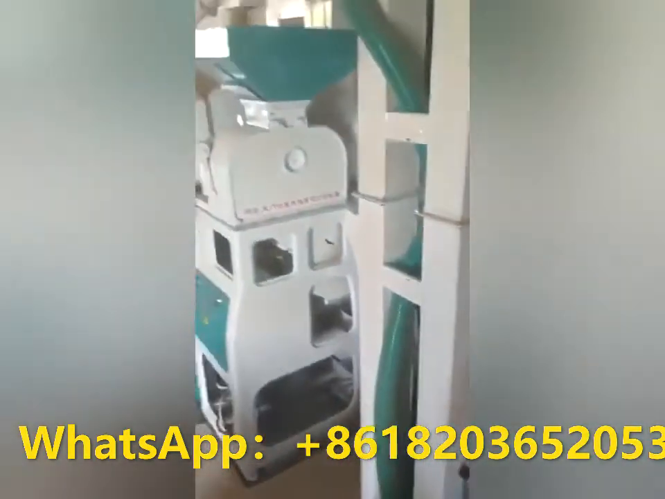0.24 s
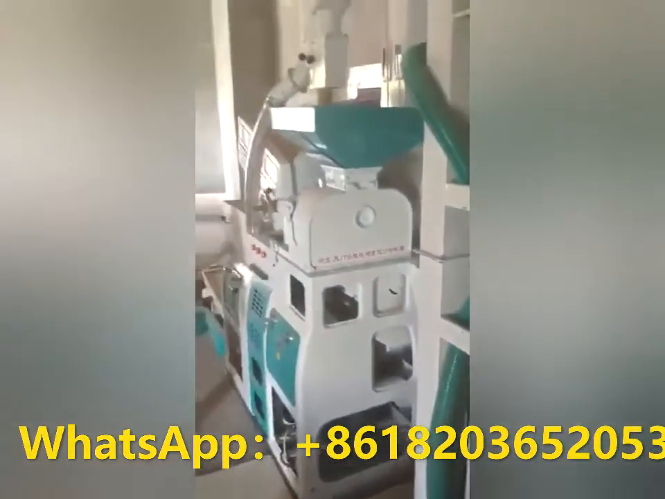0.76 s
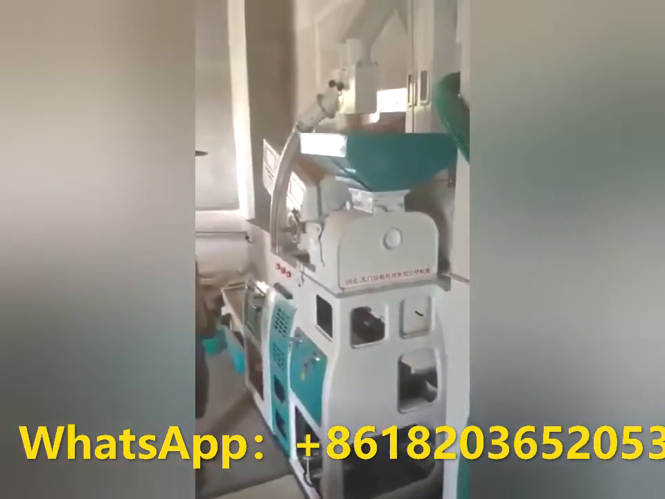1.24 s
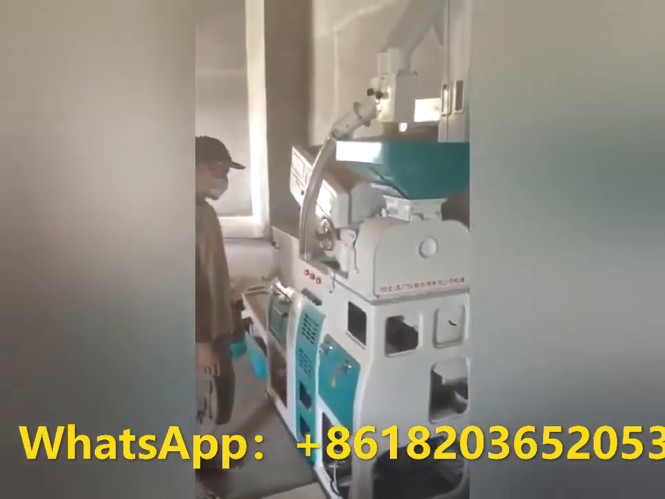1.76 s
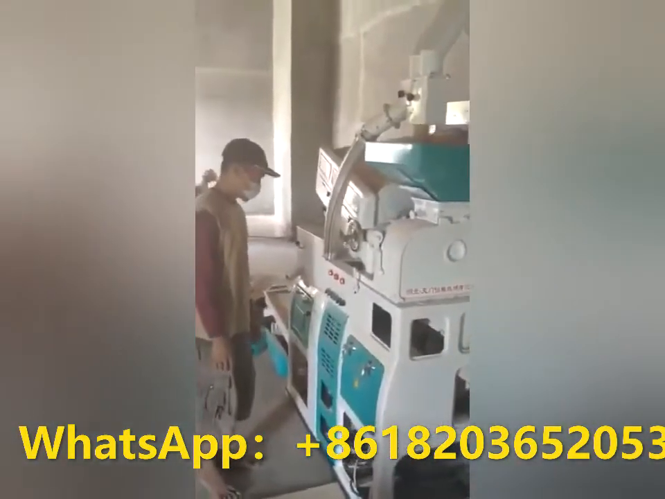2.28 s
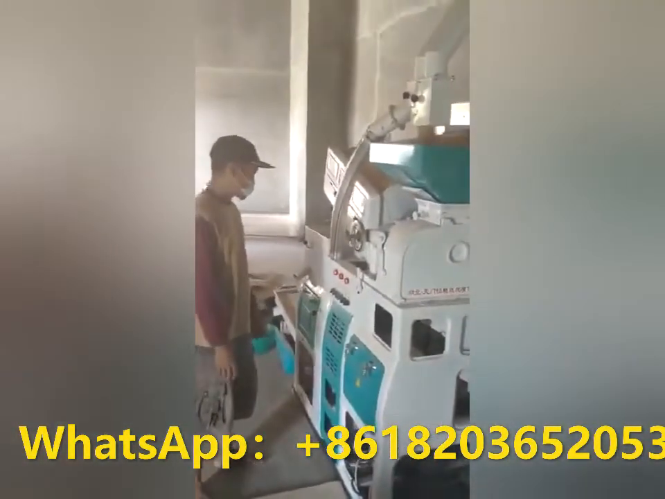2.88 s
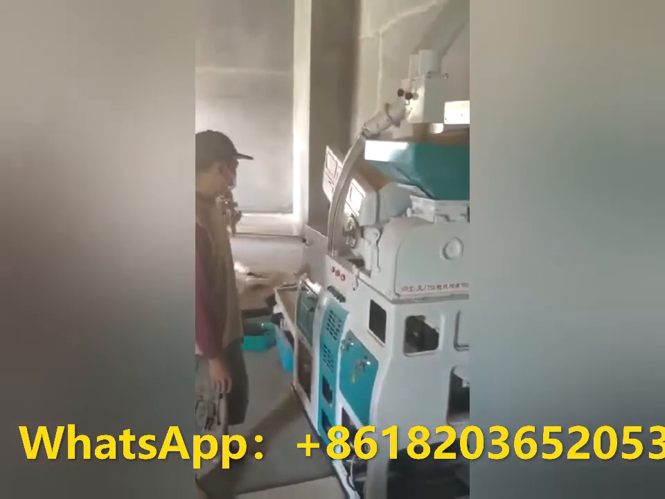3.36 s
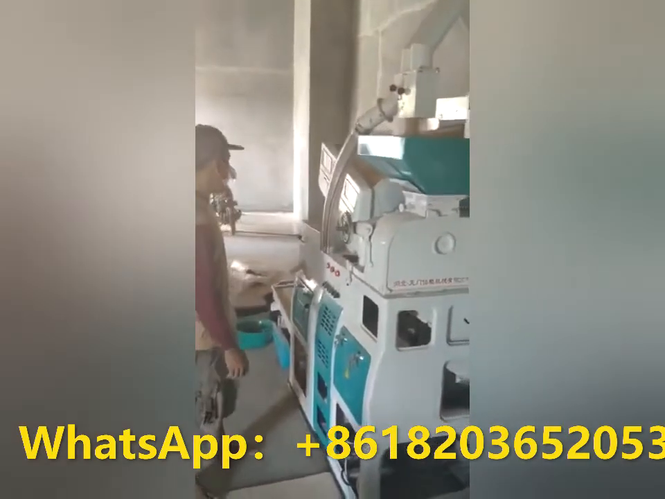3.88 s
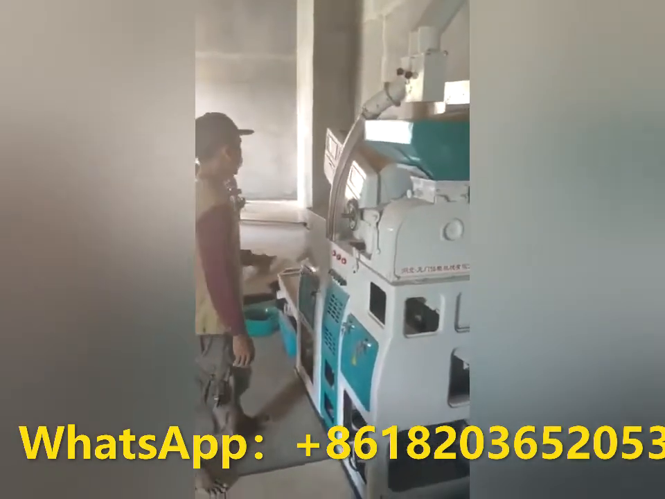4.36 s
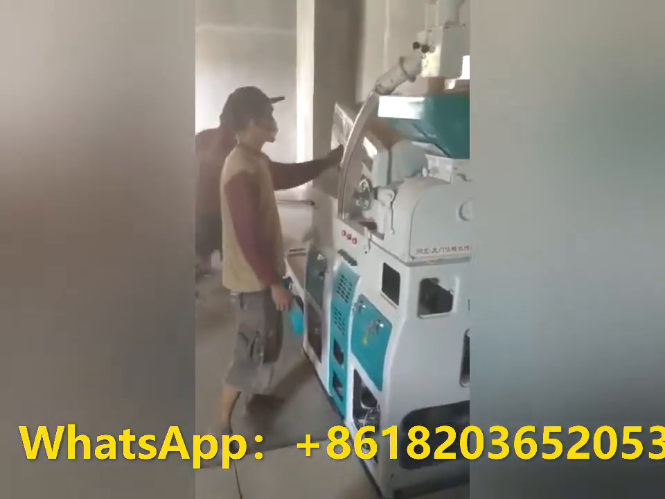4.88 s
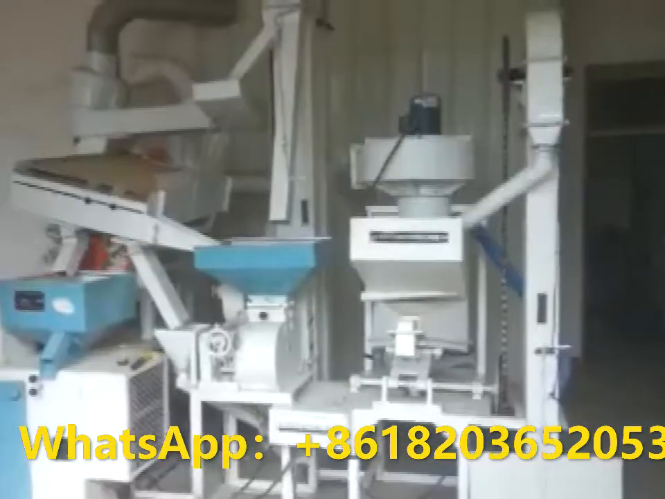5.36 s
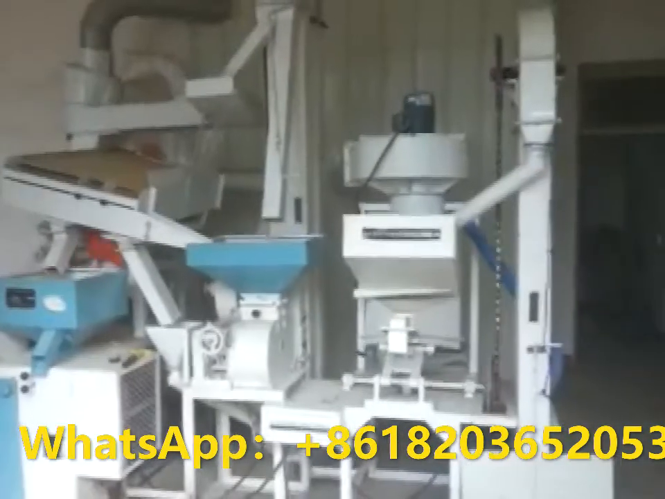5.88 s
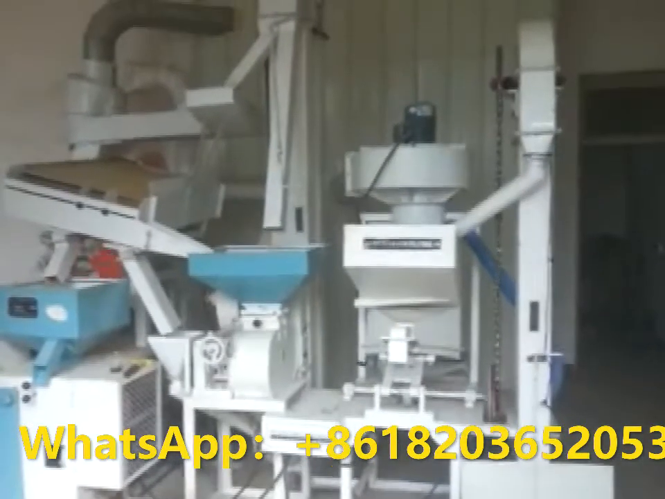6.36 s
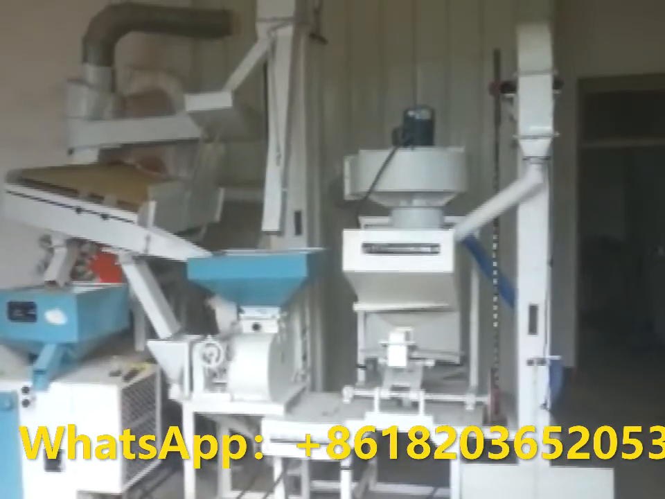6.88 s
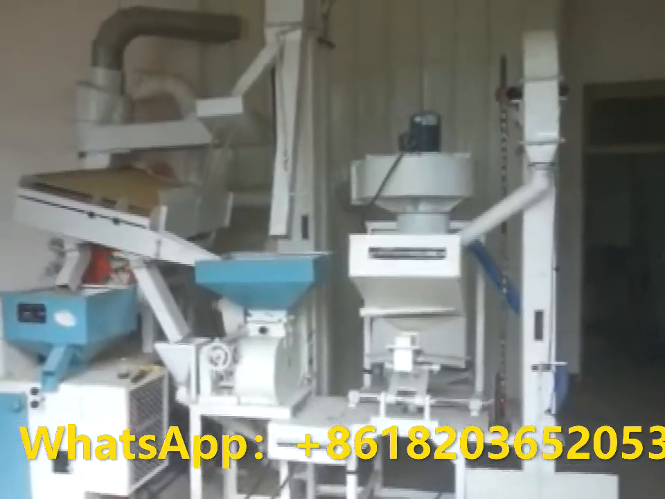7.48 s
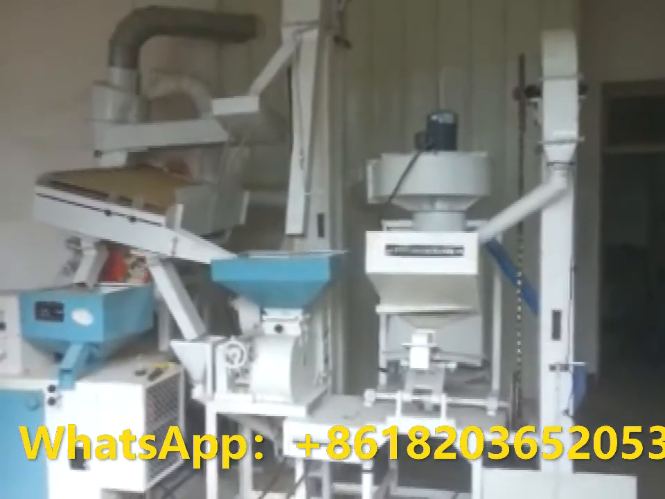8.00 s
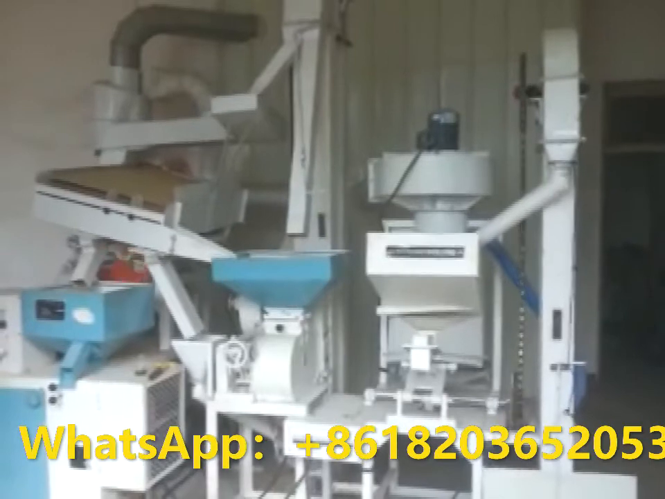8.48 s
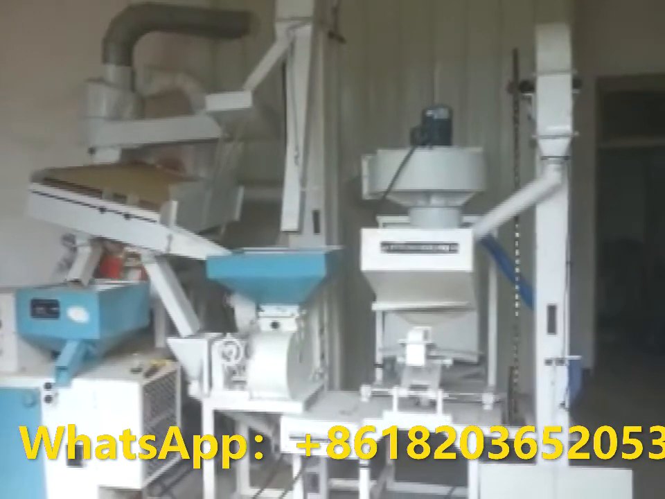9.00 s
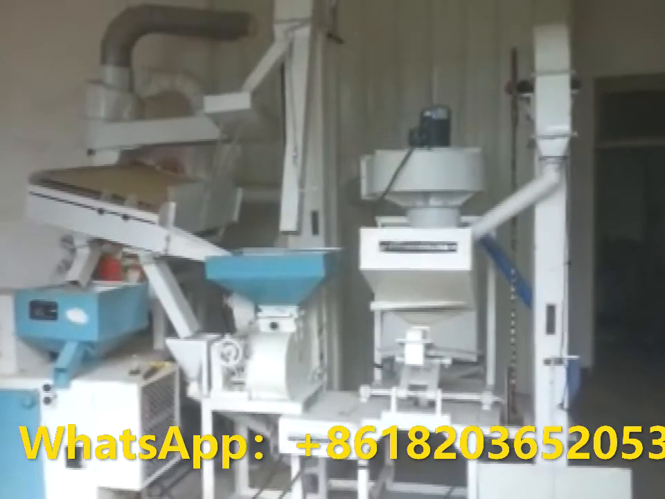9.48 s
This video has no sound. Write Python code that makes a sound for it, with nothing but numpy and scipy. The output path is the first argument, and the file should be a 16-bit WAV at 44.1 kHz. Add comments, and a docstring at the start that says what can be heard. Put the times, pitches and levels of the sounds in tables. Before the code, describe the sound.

Two milling machines are heard one after the other on a mill floor. First comes a close stereo din of fan roar, wavering motor hum, deep throbbing and bright hissing grain, with short high squeals of rubbing steel. It stops abruptly. After a tiny gap, a duller, narrower machine din takes over: rumbling, dense grain rattle and a whine of gears and rollers, surging slightly over a low drone.

```python
"""A rice mill floor: two mills at work, heard one after the other with a short silence between.
First a tall mill close by, in stereo: fan roar booms in its cabinet, the base throbs, grain hisses
through steel chutes, motors hum and rubbing steel squeals. Then a milling line in dull mono:
frames rumble, grain rattles on a shaking sieve, shafts drone, gears and rollers whine."""
import sys
import numpy as np
from scipy import signal
from scipy.fft import rfft, irfft, next_fast_len
from scipy.io import wavfile
from scipy.ndimage import uniform_filter1d, minimum_filter1d

SR = 44100
rng = np.random.default_rng(int(sys.argv[2]) if len(sys.argv) > 2 else 0)


def materialize(psi):
    """Save the field psi as 16-bit PCM at rate SR to the path in sys.argv[1].

    A 1-D psi becomes a single channel; in a 2-D psi each row is a channel.
    """
    bounded = np.clip(np.atleast_2d(psi).T, -1, 1)
    quanta = np.round(bounded * 32767).astype(np.int16)
    wavfile.write(sys.argv[1], SR, quanta)


N = 429527
TIME = np.arange(N) / SR


def gain_of(db):
    """Decibels to amplitude."""
    return 10 ** (np.asarray(db) / 20)


def db_at(table, hz):
    """Interpolates a table on a log-frequency axis."""
    table_hz, db = np.transpose(table)
    return np.interp(np.log(hz + 1), np.log(table_hz + 1), db)


def unit_rms(x):
    """Scales to rms 1."""
    return x / np.sqrt(np.mean(x ** 2) + 1e-20)


def filtered(x, gain):
    """Filters x by a gain that is a function of Hz."""
    size = next_fast_len(N)
    return irfft(rfft(x, size) * gain(np.fft.rfftfreq(size, 1 / SR)), size)[..., :N]


def coloured(x, spectrum):
    """Gives white sound of rms 1 a spectrum in dB per Hz."""
    return filtered(x, lambda hz: gain_of(db_at(spectrum, hz)) * np.sqrt(SR / 2))


def low_pass(x, edge_hz):
    """Steep band limit on every channel."""
    taps = signal.firwin(1023, edge_hz, window=("kaiser", 9), fs=SR)
    return signal.oaconvolve(x, taps[None], "same")


def wander(rate_hz, size=4096):
    """Random drift of rms 1, mostly below rate_hz."""
    hz = np.fft.rfftfreq(size, N / SR / size)
    slow = irfft(rfft(rng.standard_normal(size)) * (hz > 0) / (1 + (hz / rate_hz) ** 2), size)
    return np.interp(TIME, np.linspace(0, N / SR, size), unit_rms(slow))


def swell(centre_s, length_s):
    """Gaussian rise and fall of height 1."""
    return np.exp(-np.pi * ((TIME - centre_s) / length_s) ** 2)


def swells_db(table):
    """Sum of brief level changes."""
    return sum(db * swell(centre_s, length_s) for centre_s, db, length_s in table)


def tremolo_db(rate_hz, peak_s, swing_db):
    """Even rise and fall in level."""
    return swing_db * np.cos(2 * np.pi * rate_hz * (TIME - peak_s))


# Each row: frequency in Hz, density in dB per Hz.
ROAR_SPECTRUM_DB = [(20, -62), (60, -60), (95, -62.5), (135, -51), (175, -42), (240, -41.5), (290, -42),
                    (360, -44.5), (440, -40), (580, -41), (1000, -49.5), (2000, -57), (4500, -68.5),
                    (12000, -80.5)]


def fan_roar():
    """Fan air and churning grain: nearly steady noise."""
    drift_db = 0.2 * wander(6)
    return coloured(rng.standard_normal((2, N)), ROAR_SPECTRUM_DB) * gain_of(drift_db)


# Each row: frequency in Hz, density in dB per Hz.
THROB_SPECTRUM_DB = [(20, -77), (55, -63.5), (78, -54.5), (97, -47), (120, -48), (145, -55), (220, -72.5),
                     (1000, -110)]
# Each row: centre in seconds, boost in dB.
SHUDDERS_DB = [(.68, 3.5), (1.49, 12), (1.95, 11.5), (2.17, 7), (3.25, 12), (3.67, 4.5), (3.98, 5.5),
               (4.39, 7.5), (4.65, 13), (4.93, 11)]


def base_throb(rest_db=-5, shudder_s=0.089):
    """The tall mill's base throbs deeply and shudders now and then."""
    shudders_db = sum(db * swell(centre_s, shudder_s) for centre_s, db in SHUDDERS_DB)
    level_db = rest_db + 3.0 * wander(7) + shudders_db
    return coloured(rng.standard_normal((2, N)), THROB_SPECTRUM_DB) * gain_of(level_db)


def impacts(per_s, spread_db):
    """White train of tiny blows, a few much harder than the rest."""
    hits = (rng.random(N) < per_s / SR) * rng.choice([-1, 1], N)
    force_db = spread_db * np.minimum(rng.exponential(1, N), 4)
    return unit_rms(hits * gain_of(force_db))


def patchy(x, depth_db, width_hz, length_s, size=512, hop=128):
    """Small patches of the spectrum swell and fade at random, giving a restless texture."""
    frames = signal.stft(x, nperseg=size, noverlap=size - hop)[2]
    patches = uniform_filter1d(rng.standard_normal(frames.shape), round(width_hz * size / SR), -2)
    patches = uniform_filter1d(patches, round(length_s * SR / hop), -1)
    frames = frames * gain_of(depth_db * unit_rms(patches))
    return unit_rms(signal.istft(frames, nperseg=size, noverlap=size - hop)[1][..., :N])


# Each row: frequency in Hz, density in dB per Hz.
GRAIN_SPECTRUM_DB = [(60, -78.5), (400, -67), (1000, -50), (1350, -50.5), (1580, -55), (2000, -52.5),
                     (3000, -55), (3700, -56), (4500, -57.5), (5300, -59), (6500, -60.5), (8000, -59.5),
                     (9500, -57.5), (11000, -55), (12400, -58.5)]
# Fuller and thinner flow. Each row: centre in seconds, change in dB, length in seconds.
GUSHES_DB = [(0.226, 1.0, 0.076), (0.73, 1.5, 0.14), (.86, 2, 0.05), (0.984, 1.0, 0.048), (1.14, 1, .06),
             (2.01, 0.5, 0.08), (2.234, .6, .05), (2.815, 1.5, 0.054), (3.099, 1, .06), (3.25, 0.4, 0.14),
             (3.483, 1.3, 0.053), (4.046, 1, 0.15), (4.225, 1.7, 0.073), (4.9, -0.2, .1)]
CHUTE_LULLS_DB = [(.6, 0, 0.052), (1.35, -0.2, .08), (1.9, 0, .08), (2.63, -0.9, 0.092), (3.8, -1, .1),
                  (4.58, -0.5, .08)]


def chute_grain(rest_db=-0.48):
    """Kernels strike the steel chutes and merge into hiss that ripples slightly four times a second."""
    ripple_db = tremolo_db(rate_hz=4.0, peak_s=0.2, swing_db=0.42)
    level_db = rest_db + 0.63 * wander(12) + ripple_db + swells_db(GUSHES_DB) + swells_db(CHUTE_LULLS_DB)
    blows = np.array([impacts(per_s=14000, spread_db=2.0) for _ in range(2)])
    blows = patchy(blows, depth_db=2.5, width_hz=220, length_s=0.036)
    return coloured(blows, GRAIN_SPECTRUM_DB) * gain_of(level_db)


def tones(table, slip, flutter, flutter_hz):
    """Turning parts: load bends their speed together; each flutters in phase and level."""
    clock_s = TIME + slip * np.cumsum(wander(1.95)) / SR
    out = np.zeros(N)
    for hz, db in table:
        phase = 2 * np.pi * (hz * clock_s + rng.random()) + flutter * wander(flutter_hz)
        out += gain_of(db) * (1 + flutter * wander(flutter_hz)) * np.cos(phase)
    return out * np.sqrt(2 / (1 + flutter ** 2))


def rotors(pitches_hz, levels):
    """Rotors hold their pitch while each follows its own level curve."""
    times_s, *curves_db = np.transpose(levels)
    out = np.zeros(N)
    for hz, curve_db in zip(pitches_hz, curves_db):
        tone = tones([(hz, 0)], slip=0.0005, flutter=0.08, flutter_hz=1.4)
        out += tone * gain_of(np.interp(TIME, times_s, curve_db))
    return out


# Each row: frequency in Hz, level in dB.
HUM_TONES_DB = [(98.2, -39.5), (161.8, -33), (193.2, -35), (228.7, -31), (257.1, -31.5), (399.7, -36),
                (1064.5, -39)]
# Main motor, a second rotor beating against it, fan, fan octave.
ROTOR_PITCHES_HZ = (205.65, 216.5, 426.8, 853.6)
# Each row: time in seconds, then the level in dB of each of those four.
ROTOR_LEVELS_DB = [(0, -18.5, -31, -21.5, -37.5), (.5, -23.5, -22, -29, -38.5),
                   (.9, -27.5, -32.5, -33, -34), (1.3, -19, -39, -27.5, -41.5),
                   (1.75, -20, -36, -33, -42.5), (2.3, -19.5, -37, -25, -33),
                   (2.9, -22.5, -34, -30.5, -47.5), (3.4, -18.5, -33.5, -25.5, -42.5),
                   (4.0, -22, -38, -22.5, -39), (5.0, -28.5, -43, -29, -41.5)]


def motor_and_fan_hum():
    """Wavering tones, plus four firm ones whose levels drift as the listener moves through the room."""
    wavering = tones(HUM_TONES_DB, slip=0.000945, flutter=0.28, flutter_hz=3.5)
    return wavering + rotors(ROTOR_PITCHES_HZ, ROTOR_LEVELS_DB)


# Each row: centre in seconds, left level in dB, length in seconds.
SQUEALS_DB = [(.24, -34.5, .16), (.53, -40.5, 0.11), (1.196, -21.5, 0.082), (1.499, -29, 0.16),
              (2.73, -28.5, 0.25), (3.211, -27, .14), (3.33, -31, 0.16), (3.488, -25, .1),
              (4.045, -30.5, .2)]


def steel_squeals(pitch_hz=5424, half_width_hz=50, right_db=-4):
    """A narrow, rough steel resonance flares each time the parts rub."""
    rubbing = sum(gain_of(db) * swell(centre_s, length_s) ** 2 for centre_s, db, length_s in SQUEALS_DB)
    noise = rng.standard_normal((2, N))
    ring = filtered(noise, lambda hz: 1 / (1 + ((hz - pitch_hz) / half_width_hz) ** 2))
    return unit_rms(ring) * rubbing * gain_of([[0], [right_db]])


# Each row: centre in Hz, width in Hz, boost in dB.
CABINET_MODES_DB = [(169, 16, 3.5), (229, 31, 6), (864, 40, 5.5), (1417, 120, 3), (1698, 70, 5.5),
                    (3406, 130, 0.9), (5450, 43, 7)]


def cabinet_gain(hz):
    """Sheet-steel resonances of the cabinet and chutes."""
    return gain_of(sum(db / (1 + (2 * (hz - centre_hz) / width_hz) ** 2)
                       for centre_hz, width_hz, db in CABINET_MODES_DB))


# Each row: frequency in Hz, side over mid in dB.
PORT_WIDTH_DB = [(25, -6), (70, -15), (130, -19), (230, -17), (380, -6.8), (560, -8.6), (700, -5.4),
                 (850, -2), (1250, 0), (1650, .5), (2000, -.9), (3400, -.7), (4200, 0)]
# Each row: frequency in Hz, left over right in dB.
PORT_TILT_DB = [(100, -0.1), (1500, 0.5), (4000, 0), (6300, 1.5), (7400, -1), (8100, -2.5), (9000, -14),
                (9900, -18), (11000, -17), (12400, -15)]


def stereo_ports(pair):
    """Diffuse field at two microphone ports: bass alike, treble unrelated, the left dull at the top."""
    def power_split(table):
        return lambda hz: np.sqrt(1 / (1 + gain_of(np.outer([-1, 1], db_at(table, hz))) ** 2))
    side, mid = filtered(pair, power_split(PORT_WIDTH_DB))
    return np.sqrt(2) * filtered(np.array([mid + side, mid - side]), power_split(PORT_TILT_DB))


def tall_mill():
    """Roar, throb and grain resonate in the cabinet; hum and squeals arrive directly."""
    body = filtered(fan_roar() + base_throb() + chute_grain(), cabinet_gain)
    return stereo_ports(body) + motor_and_fan_hum() + steel_squeals()


# Each row: centre in seconds, change in dB, length in seconds.
LINE_LULLS_DB = [(5.8, -1.5, 0.046), (6.46, -1.5, .04), (7.135, -0.5, .03), (7.495, -2.5, 0.031),
                 (9.58, -2, .08)]
# Each row: centre and length in seconds, then change in dB of frame shake, sieve clatter, grain flow.
LUMPS_DB = [(5.461, .06, 0, -1, 4), (5.692, 0.035, 0.5, 2, 1), (5.92, 0.04, 2.5, 2.5, 0),
            (6.062, 0.056, 0, 0, 5), (6.125, 0.055, -2.5, 1.3, 2.5), (6.512, 0.055, 0, 1.5, 3),
            (6.672, 0.046, 0.5, 1.5, 0.2), (6.745, 0.11, 0, 1, 5), (6.852, 0.056, 3, 1.5, 1.8),
            (7.035, 0.051, 1.5, 2, 0.5), (7.262, 0.045, -0.5, 2, -3), (7.363, 0.031, 3, 2.5, .8),
            (7.572, .05, -3.5, 1, 4), (7.683, 0.092, -0.5, 1.5, 1), (7.822, 0.031, 3.5, 0.5, 0.5),
            (8.08, .07, 3.5, 0.5, 1.5), (8.176, 0.05, 2, 1.5, 0), (8.292, 0.033, 2, 1.5, -0.5),
            (8.64, 0.039, -1, 0.5, 2), (8.841, 0.072, 2, 0.5, -0.5), (9.136, 0.046, 1.5, 3, -1.5),
            (9.655, 0.036, 4.5, 0, 0)]


def line_load_db(rest_db=0.09, drift_hz=18):
    """Shake, clatter and flow drift, jolt with lumps of grain and ease in lulls; the sieve rocks."""
    jolts_db = sum(np.outer(db, swell(centre_s, length_s)) for centre_s, length_s, *db in LUMPS_DB)
    shake_db, clatter_db, flow_db = rest_db + swells_db(LINE_LULLS_DB) + jolts_db
    rocking_db = tremolo_db(rate_hz=5.29, peak_s=5.352, swing_db=0.28)
    return (shake_db + 0.85 * wander(drift_hz),
            clatter_db + 0.6 * wander(drift_hz) + rocking_db,
            flow_db - 0.6 * wander(drift_hz))


# Each row: frequency in Hz, density in dB per Hz.
RUMBLE_SPECTRUM_DB = [(20, -88), (45, -68), (68, -54.5), (82, -56.5), (105, -56), (150, -45.5),
                      (200, -47.5), (225, -45.5), (260, -41.5), (340, -42), (430, -45), (490, -50),
                      (540, -58.5), (900, -62.5), (3600, -77.5)]


def frame_rumble(shake_db):
    """Low noise of the line's shaking frames and ducts."""
    return coloured(rng.standard_normal(N), RUMBLE_SPECTRUM_DB) * gain_of(shake_db)


# Each row: frequency in Hz, density in dB per Hz.
RATTLE_SPECTRUM_DB = [(40, -100), (300, -76.5), (560, -58.5), (620, -57.5), (670, -52), (950, -53.5),
                      (1170, -52.5), (1280, -53.5), (1400, -53), (1500, -52.5), (1600, -51), (1700, -53),
                      (1900, -53), (2250, -55), (2550, -58.5), (2900, -59), (3250, -58), (3600, -62)]


def sieve_rattle(clatter_db, flow_db, split_hz=2300):
    """Grain hits sieve and rollers: the screen sounds the low part of each blow, the kernels the top."""
    blows = patchy(impacts(per_s=4500, spread_db=1.5), depth_db=1.5, width_hz=300, length_s=0.044)
    rattle = coloured(blows, RATTLE_SPECTRUM_DB)
    screen = filtered(rattle, lambda hz: 1 / (1 + (hz / split_hz) ** 8))
    kernels = rattle - screen
    return screen * gain_of(clatter_db) + kernels * gain_of(flow_db)


# Each row: frequency in Hz, relative level in dB.
SHAFT_ORDERS_DB = [(70.0, -47.5), (92.9, -43), (138.6, -39.5), (162.4, -38), (185.7, -41.5), (208.6, -39),
                   (255.0, -35), (301.5, -35)]


def shaft_drone(level_db=-0.6):
    """Low, wavering orders of the turning shafts."""
    return gain_of(level_db) * tones(SHAFT_ORDERS_DB, slip=0.0014, flutter=0.38, flutter_hz=2.6)


# Each row: frequency in Hz, relative level in dB.
GEAR_TONES_DB = [(296.1, -35), (378.8, -38), (391.6, -38), (419.2, -39), (445.5, -39), (472.4, -42),
                 (656.1, -45), (757.7, -40.5), (763.1, -44), (900.4, -35.8), (959.6, -42), (975.1, -47),
                 (996.6, -45), (1010.7, -38), (1021.5, -43), (1035.6, -45), (1063.2, -44), (1124.5, -46),
                 (1131.8, -43), (1137.2, -36.5), (1181.0, -46), (1195.5, -45), (1331.0, -46), (1349.9, -43),
                 (1368.0, -42), (1387.5, -41), (1394.3, -34), (1401.7, -42), (1420.5, -40), (1425.2, -35.5),
                 (1446.8, -39), (1462.2, -43), (1480.4, -35), (1492.5, -37.5), (1499.2, -37.5),
                 (1518.1, -34), (1553.1, -45), (1635.2, -42), (1650.0, -40), (1664.8, -34), (1680.3, -44),
                 (1702.5, -43), (1733.4, -39), (1741.5, -41), (1746.9, -33.5), (1780.5, -43), (1818.2, -43),
                 (1857.2, -40), (1882.8, -43), (1954.8, -43), (1968.3, -42), (2013.4, -44), (2047.7, -45),
                 (2071.2, -39.5), (2110.3, -42), (2201.8, -46), (2236.8, -42), (2254.3, -45), (2328.3, -41),
                 (2598.8, -40), (2625.7, -46), (2997.2, -50), (3106.2, -46), (3176.1, -51), (3342.4, -50),
                 (3367.9, -50), (3559.7, -47)]


def gear_whine(clatter_db):
    """Gears and rollers sing, surging with the sieve's clatter."""
    return gain_of(clatter_db) * tones(GEAR_TONES_DB, slip=0.00024, flutter=0.31, flutter_hz=1.0)


# Each row: time in seconds, level in dB.
LINE_HUM_DB = [(5.2, -30), (5.42, -29), (5.57, -38), (5.95, -29), (6.35, -39), (6.57, -34), (6.7, -30),
               (7.05, -28.5), (7.32, -35), (7.5, -29), (8.35, -30.5), (8.5, -32.5), (8.7, -30), (9.35, -31),
               (9.7, -37)]


def line_motor_hum(pitch_hz=115.7):
    """One motor tone fades in and out of the rumble."""
    return rotors([pitch_hz], LINE_HUM_DB)


def limited(x, ceiling_db, size=65):
    """Quick limiter: the gain dips for a few milliseconds around each tall peak."""
    allowed_gain = np.minimum(1, gain_of(ceiling_db) / (abs(x) + 1e-9))
    return x * uniform_filter1d(minimum_filter1d(allowed_gain, size, -1), size, -1)


# Pass band and leak of its mirror image. Each row: frequency in Hz, gain in dB.
PASS_BAND_DB = [(3620, 0), (3690, -7), (3760, -18), (3820, -27), (3900, -75), (4000, -120)]
MIRROR_LEAK_DB = [(4200, -15), (4300, -20), (4380, -26), (4500, -38), (4620, -52), (4700, -67), (5100, -95),
                  (6000, -140)]


def narrow_band(x, rate_hz=8000):
    """Dull, low-rate sound path: a faint mirror image of its top sizzles just above the band edge."""
    dull = filtered(x, lambda hz: gain_of(db_at(PASS_BAND_DB, hz)))
    mirror = dull * 2 * np.cos(2 * np.pi * rate_hz * TIME)
    return dull + filtered(mirror, lambda hz: gain_of(db_at(MIRROR_LEAK_DB, hz)))


def milling_line():
    """Rumble, rattle and whine surge with the load over drone and hum, all in narrow-band mono."""
    shake_db, clatter_db, flow_db = line_load_db()
    surging = frame_rumble(shake_db) + sieve_rattle(clatter_db, flow_db) + gear_whine(clatter_db)
    mono = surging + shaft_drone() + line_motor_hum()
    dull = low_pass(mono[None], edge_hz=3850)
    return narrow_band(limited(dull, ceiling_db=-3.4))


# Each row: time in seconds, gain in dB.
TALL_FADE_DB = [(0, 0), (4.989, 0), (4.992, -12), (5.005, -13), (5.016, -48), (5.04, -120)]
LINE_FADE_DB = [(5.163, -120), (5.165, -3), (5.185, 0)]


def scene():
    """The tall mill, a moment of silence, then the milling line."""
    tall_gain = gain_of(np.interp(TIME, *np.transpose(TALL_FADE_DB)))
    line_gain = gain_of(np.interp(TIME, *np.transpose(LINE_FADE_DB)))
    return tall_gain * tall_mill() + line_gain * milling_line()


def record(dry):
    """Clips peaks just under full scale, then limits the band."""
    return low_pass(np.clip(dry, -0.95, 0.95), edge_hz=12450)


dry = scene()
out = record(dry)
materialize(out)
```